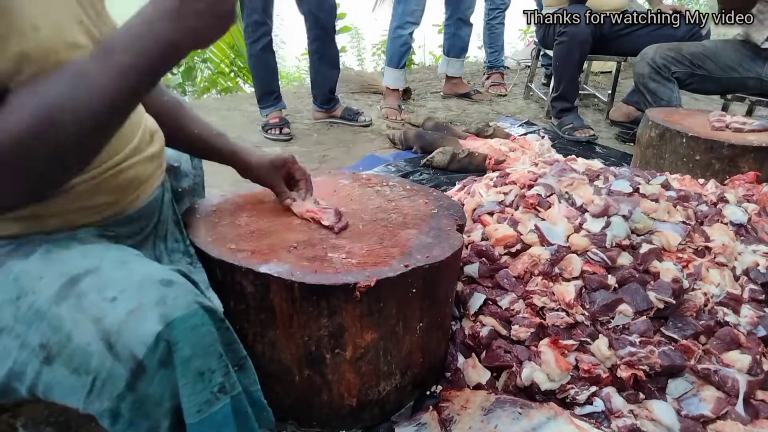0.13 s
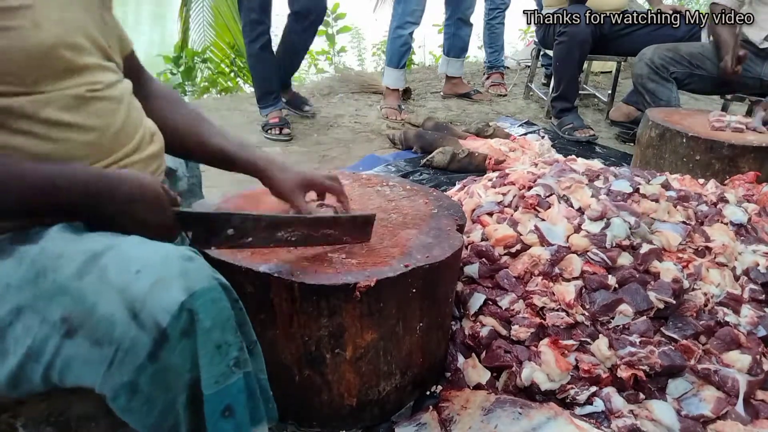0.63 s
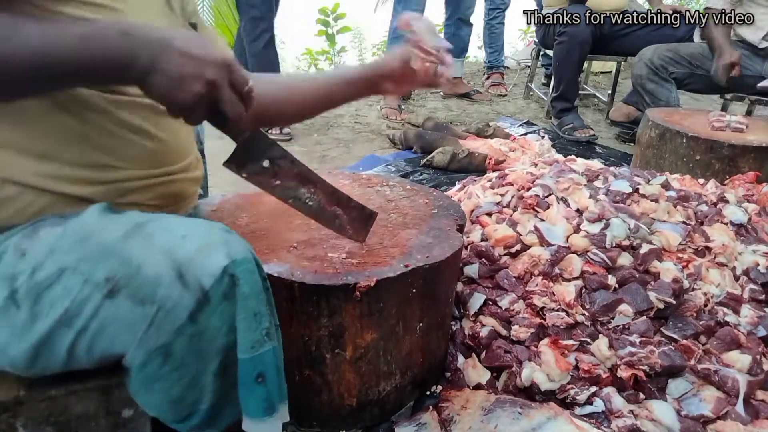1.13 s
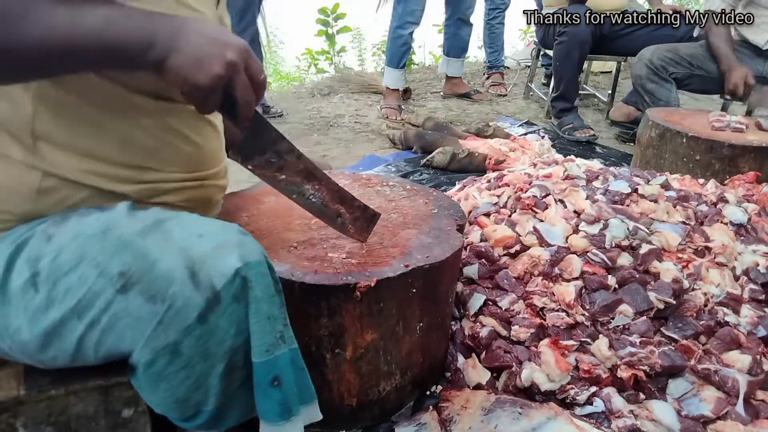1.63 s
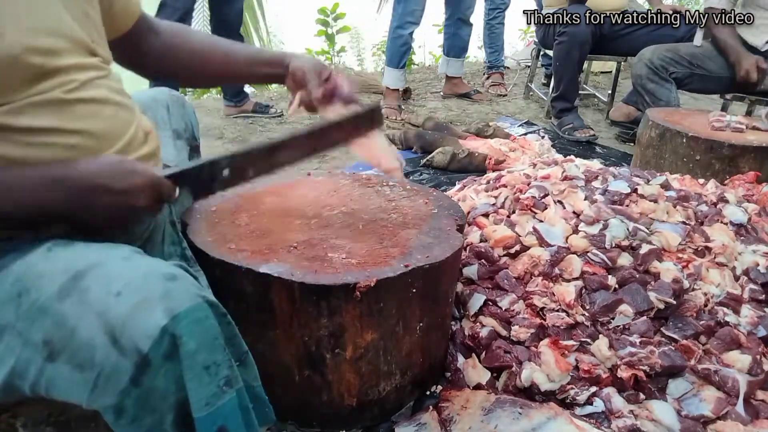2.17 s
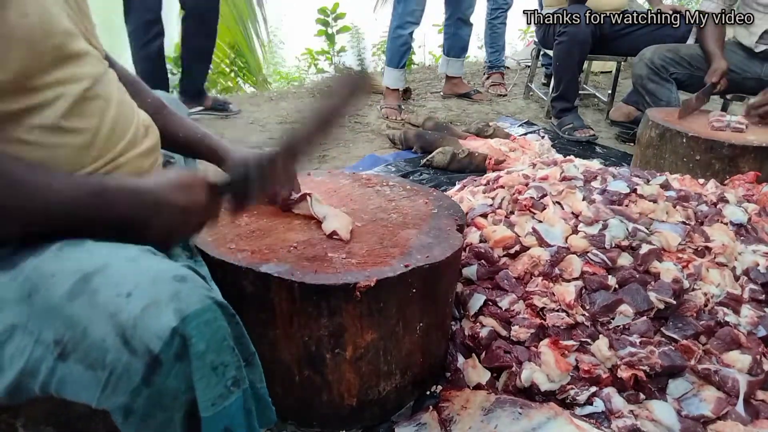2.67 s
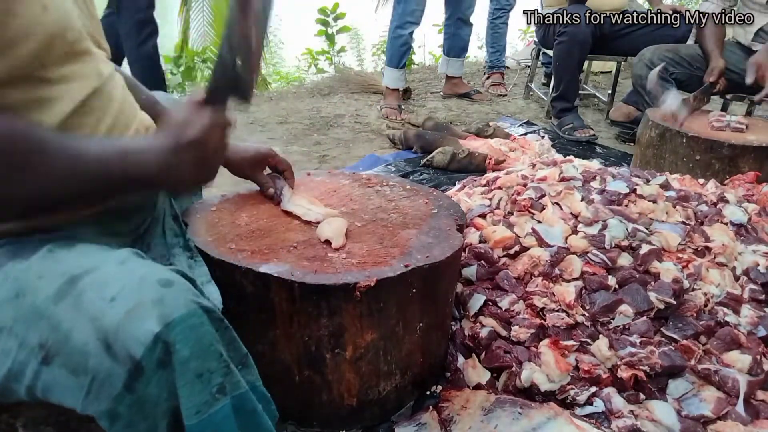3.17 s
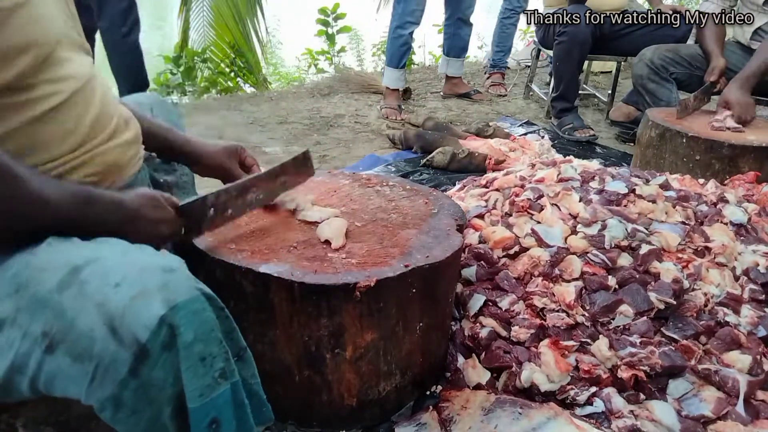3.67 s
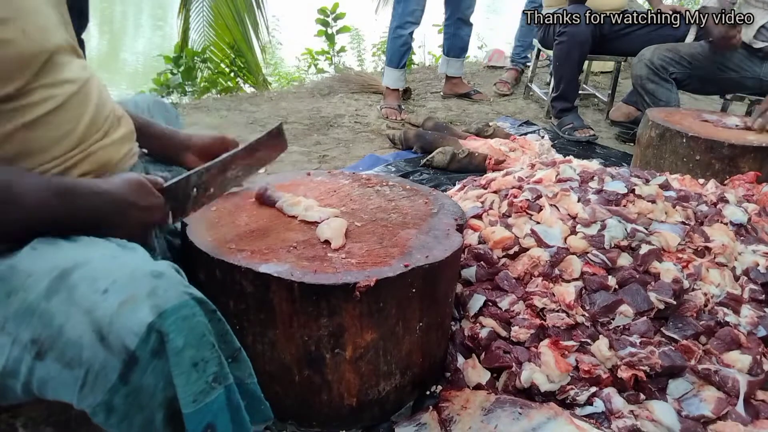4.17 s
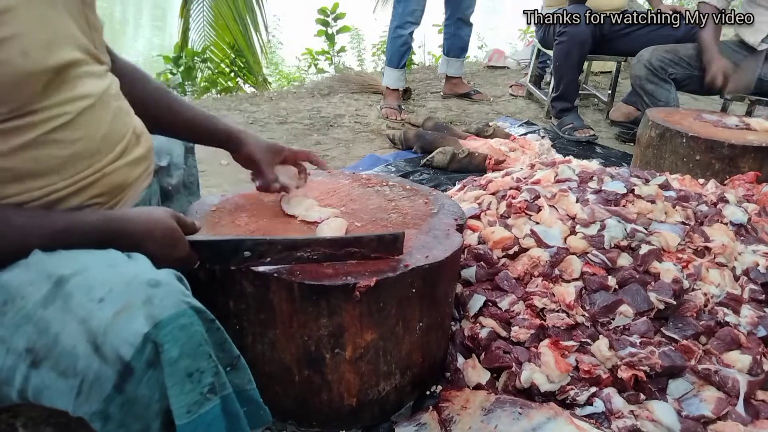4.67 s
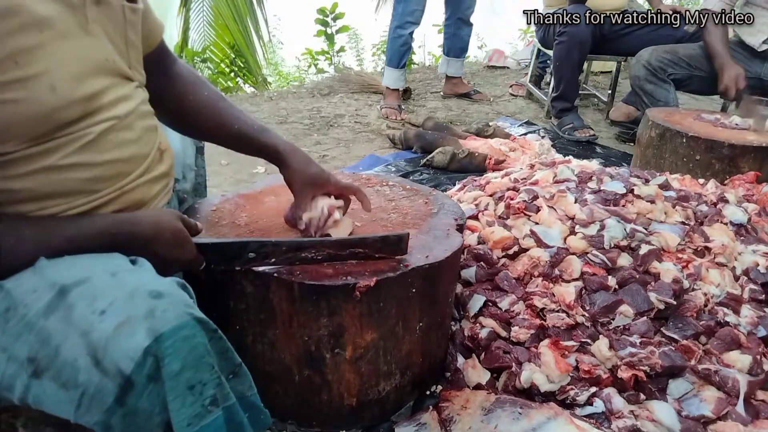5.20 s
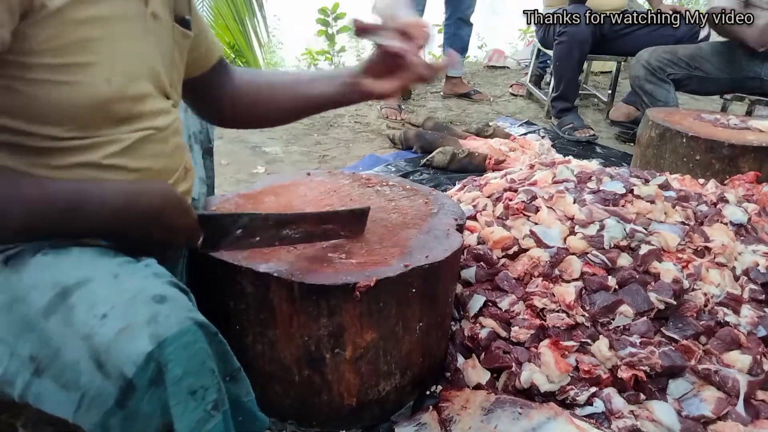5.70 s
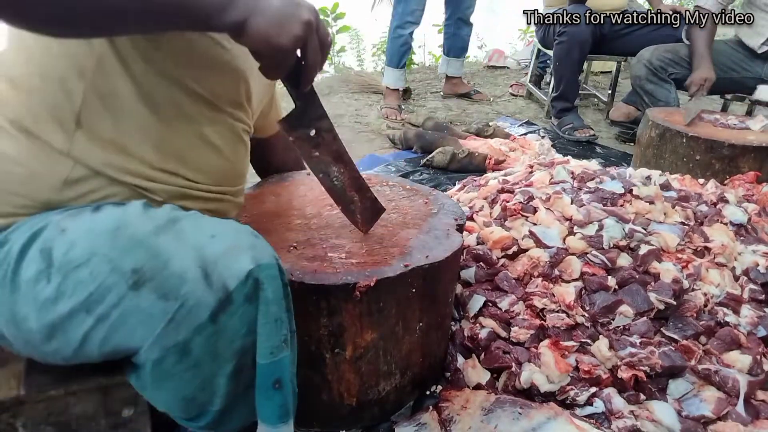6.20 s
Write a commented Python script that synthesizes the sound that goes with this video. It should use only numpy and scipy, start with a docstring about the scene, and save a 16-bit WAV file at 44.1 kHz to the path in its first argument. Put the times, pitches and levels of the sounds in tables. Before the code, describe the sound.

Heavy steel cleavers chop meat on wooden log blocks in an open yard, sharp woody cracks overlapping with brief blade rings and faint echoes.

```python
"""Three butchers chop meat with heavy steel cleavers on log blocks in an open yard, in overlapping rhythms.
Each blow is a crack of splitting wood (banded noise), a thump of the log and a short ring of the blade
(decaying modes); noise tails give the yard's reflections and the answers of two walls.
Softer touches, scraps of meat, hollow raps, faint squeaks (gliding sines), wind on the microphone
(lumpy noise and low pressure swings), a hum, a rustle and a sizzle (coloured noise) fill the gaps."""
import sys
import numpy as np
from scipy import signal
from scipy.fft import rfft, irfft
from scipy.io import wavfile
from scipy.ndimage import uniform_filter1d

SR = 44100
rng = np.random.default_rng(int(sys.argv[2]) if len(sys.argv) > 2 else 0)


def makeup_ratio(level_db):
    """Linear amplitude ratio for a level in decibels (20 dB per factor of ten)."""
    decades = np.asarray(level_db, float) / 20
    return 10 ** decades


def unload_audio(sound):
    """Save the sound as a 16-bit wav file, at the path given as the first command line argument."""
    columns = np.transpose(np.atleast_2d(sound))
    # keep every value between -1 and 1, then stretch to whole-number steps
    steps = np.round(np.clip(columns, -1, 1) * 32767)
    wavfile.write(sys.argv[1], SR, steps.astype(np.int16))


N = 279153

# Blows of the cleavers. Each row: time in seconds, which cleaver, peak of the knock (0.5-1.5 kHz) in dB,
# then in dB re knock the thump below, the crack (1.5-4.5 kHz) and the spit above,
# and the glance from 0, edge buried in the wood, to 1, springing off it.
BLOWS = [(.037, "third", -13.5, -8.5, 4, -12, 0.046), (.156, "first", -7, -2, -7, -22, 0.066),
         (.383, "second", -15, -6.5, -6, -21.5, 0.98), (.586, "first", -19.5, -2.1, -6.5, -27, 1),
         (1.006, "third", -19, -6.5, 0, -12, 0.48), (1.344, "first", -8, -5, -0.8, -16.5, 0.04),
         (1.825, "first", -8, -7, 3, -24, 0.054), (2.304, "first", -19.5, -4, -6.5, -27, 0.85),
         (2.459, "third", -11.5, -9.5, 3.5, -14.5, 0.54), (2.93, "second", -9, -4, -4.5, -8, 0.31),
         (3.392, "second", -8, -5.5, 1.5, -9, 0.043), (3.851, "second", -4, -9.5, -6, -21, 0.085),
         (4.432, "first", -5.5, -6, -6.5, -21, 0.13), (4.981, "first", -7.5, -3.5, -0.9, -16, .04),
         (5.411, "second", -44.5, 17, -1, -9, 0.85), (5.508, "first", -8, -1.5, -2.5, -18, .03),
         (5.949, "first", -28.5, -0.5, -11.5, -30, 0.4)]
# Bending modes of the three blades. Each row: frequency in Hz, relative level in dB when buried,
# the same when glancing, decay time T60 in seconds when buried.
FIRST_BLADE_MODES = [(830, -2, -12, .055), (1179, -5, -14, .07), (1530, -10, 1, .095),
                     (1780, -20, -12, .11), (2130, -13, -8, .06), (2575, -6, -9, .075),
                     (2795, -9, -10, .08), (3530, -10, -8, .09), (3680, -16, -18, .08),
                     (3855, -15, -5, .09), (5280, -12, -4, .08), (7340, -9, -6, .055),
                     (10150, -26, -24, .1)]
SECOND_BLADE_MODES = [(610, -14, -2, .07), (760, -1, 2, .045), (1250, 0, 0, .075), (1556, -9, -18, .1),
                      (1997, -26, -6, .14), (3007, -7, -25, .1), (3635, -12, -3, .07),
                      (4075, -10, -25, .05), (4130, -36, -16, .12), (5604, -30, -8, .08),
                      (7370, -28, -15, .07), (7650, -16, -20, .07)]
THIRD_BLADE_MODES = [(1084, 3.5, -13, 0.023), (1260, -5, -1.5, 0.025), (1530, -23, -29, 0.072),
                     (2082, 23, 10, 0.011), (3140, -8, -11.5, 0.024), (3630, -22.5, -11.5, 0.017),
                     (7340, 0, -10.5, 0.041), (10100, -5.5, -6, 0.029)]
# How sharply each cleaver's edge meets the wood. Each entry: snap before band shaping in dB.
EDGE_SNAP_DB = [18.5, 12, 24]
# How long each cleaver's contact lasts. Each entry: factor on the decay times.
CONTACT_STRETCH = [1.08, 0.84, 0.85]
# Ring of each blade. Each row: level in dB re blow when buried, the same when glancing.
RING_RE_BLOW_DB = [(-1.2, -4), (-3.5, -1.5), (-6, -9)]
# Borders of the knock, crack and spit bands. Each entry: frequency in Hz.
BAND_EDGES_HZ = [500, 1500, 4500, 17000]


def cleaver(name, modes, snap_db, stretch, ring_re_db):
    """Impact excitation of a plate: the edge slips through the meat, cracks on the log and sets the blade's
    modes ringing; returns (direct sound, what the surroundings scatter)."""
    near, far = np.zeros(N), np.zeros(N)
    hz, buried_db, glancing_db, t60 = np.transpose(modes)[:, :, None]
    band = np.searchsorted(BAND_EDGES_HZ, hz) - 1
    for s, who, knock_db, thump_db, crack_db, spit_db, glance in BLOWS:
        if who != name:
            continue
        glance = np.clip(glance, 0, 1)
        slip = contact(knock_db - 23, -21, crack_db, spit_db + 16.5, snap_db=-4, rise_s=0.0013, stretch=1)
        add(near, slip, s - .004)
        levels_db = (knock_db, thump_db, crack_db, spit_db)
        add(near, contact(*levels_db, snap_db=snap_db, rise_s=0.00017, stretch=stretch), s - .001)
        add(far, contact(*levels_db, snap_db=19.5, rise_s=0.0002, stretch=0.61), s)

        # bright blows stir the high modes
        ring_db = np.interp(glance, [0, 1], ring_re_db)
        scatter_db = rng.normal(0, 1.5, hz.shape)
        struck_db = knock_db + ring_db + np.array([0, crack_db, spit_db])[band] + scatter_db
        mode_db = buried_db + glance * (glancing_db - buried_db)
        longer = 1 + .3 * glance  # a blade that springs free rings longer
        blade = ring(hz, struck_db + mode_db, t60 * longer)
        add(near, blade, s - .0005)
        add(far, makeup_ratio(-7.5) * blade, s)
    return near, far


# Modes of the log block. Each row: mean frequency in Hz, relative level in dB, decay time T60 in seconds.
LOG_MODES = [(135, -23.5, 0.2), (213.2, -6, 0.057), (273.3, 6.5, 0.024), (401, -4, 0.046)]
# Spectrum of the splitting wood in knock and crack. Each row: frequency in Hz, relative level in dB per Hz.
WOOD_SPECTRUM = [(180, -39), (300, 9.5), (407, 7.5), (551, -8.5), (804, -1.5), (897, -4.5), (1570, -2.5),
                 (1860, -2.5), (2820, -1.5), (5500, -24.5), (7150, -50.5), (12100, -120)]
# Spectrum of the spit. Each row: frequency in Hz, relative level in dB per Hz.
SPIT_SPECTRUM = [(2350, -42), (4000, 1.5), (4640, -6), (5470, -15.5), (5870, -19.5), (6970, -26.5),
                 (7890, -12.5), (10800, -30.5), (15200, -29.5), (16000, -36), (16400, -48)]
# Decay of the first bite, knock to spit. Each entry: T60 in seconds at stretch 1.
BITE_T60_S = [0.02, 0.034, 0.0067]
# Decay of the splintering after it, knock to spit. Each entry: T60 in seconds at stretch 1.
SPLINTER_T60_S = [0.11, 0.062, 0.088]
# The snap is nearly even across the bands, slightly weaker in the top one. Each entry: gain in dB, knock to spit.
SNAP_SHARE_DB = [0, 0, -0.5]


def contact(knock_db, thump_db, crack_db, spit_db, snap_db, rise_s, stretch):
    """Fracture noise: a snap, then splitting fibres dying in each band at their own pace; the log answers
    with a modal thump."""
    splinter_db = -9.5  # re first bite
    t = np.arange(SR // 5) / SR
    bursts = makeup_ratio(4.9 * rng.standard_normal(len(t)))
    grit = rng.standard_normal(len(t)) * bursts * (1 - np.exp(-t / rise_s))
    snap = np.arange(len(t)) == 30  # one-sample impulse

    hz, mode_db, t60 = np.transpose(LOG_MODES)[:, :, None]
    pitch = rng.normal(1, 0.13, hz.shape)  # each spot of the block sounds a little different
    log_modes = makeup_ratio(mode_db - 60 * t / t60) * np.sin(2 * np.pi * hz * pitch * t)
    thump = log_modes.sum(axis=0) * (1 - np.exp(-t / 0.0032))

    parts = [thump]
    for band, spectrum in enumerate((WOOD_SPECTRUM, WOOD_SPECTRUM, SPIT_SPECTRUM)):
        bite = makeup_ratio(-60 * t / (stretch * BITE_T60_S[band]))
        splintering = makeup_ratio(splinter_db - 60 * t / (stretch * SPLINTER_T60_S[band]))
        force = makeup_ratio(snap_db + SNAP_SHARE_DB[band]) * snap + grit * (bite + splintering)
        sos = signal.butter(3, BAND_EDGES_HZ[band:band + 2], "band", fs=SR, output="sos")
        parts.append(signal.sosfilt(sos, colour(force, spectrum)))

    levels_db = knock_db + np.array([thump_db, 0, crack_db, spit_db])
    out = np.zeros(len(t))
    for part, level_db in zip(parts, levels_db):
        peak = np.sqrt(2 * uniform_filter1d(part ** 2, size=160).max())  # from the loudest 160 samples
        out += part * makeup_ratio(level_db) / peak
    return out


def ring(hz, level_db, t60):
    """Modal decay: damped sines of chance phase; the body takes a moment to bend."""
    t = np.arange(SR // 3) / SR
    phase = rng.uniform(0, 2 * np.pi, hz.shape)
    modes = makeup_ratio(level_db - 60 * t / t60) * np.sin(2 * np.pi * hz * t + phase)
    return modes.sum(axis=0) * (1 - np.exp(-t / 0.0012))


# The two walls. Each row: delay in seconds, nominal level in dB, spread in seconds.
WALL_ECHOES = [(0.052, -27, 0.018), (0.108, -30, 0.022)]
# Colour of all reflections. Each row: frequency in Hz, gain in dB.
REFLECTION_COLOUR = [(100, 5), (300, -2.5), (1000, -3.5), (3000, 2), (6000, 7.5), (12000, 4)]
# How much each source stirs the yard. Each entry: gain in dB for the three cleavers, then the touches.
YARD_SHARE_DB = [2, -5.5, -9, -7]
# What the near wall, then the far wall, return. Each row: gain in dB for the three cleavers, then the touches.
WALL_SHARE_DB = [
    [1.5, -1, -4.5, -6],
    [1.5, -3.5, 0.5, -6.5],
]


def yard(sources):
    """Diffuse reflection: convolution with scattered, dying noise and with the blurred answers of two walls."""
    level_db, t60_s, start_s = -18, 0.69, 0.0051
    t = np.arange(SR) / SR
    build_up = 1 - np.exp(-(t / start_s) ** 2)
    powers = [makeup_ratio(2 * level_db - 120 * t / t60_s) * build_up * 14 / t60_s]
    for delay, echo_db, spread in WALL_ECHOES:
        powers.append(makeup_ratio(2 * echo_db) * np.exp(-((t - delay) / spread) ** 2) / spread)
    out = np.zeros(N)
    for share_db, power in zip([YARD_SHARE_DB, *WALL_SHARE_DB], powers):
        response = colour(rng.standard_normal(SR) * np.sqrt(power / SR), REFLECTION_COLOUR)
        stirred = makeup_ratio(np.array(share_db)) @ sources
        out += signal.fftconvolve(stirred, response)[:N]
    return out


# Edge entering meat, scraps landing, bumps. Each row: time in seconds, knock peak in dB,
# then thump, crack and spit in dB re knock.
TOUCHES = [(0.139, -56, 7, -1, -25), (.152, -47, -20, -11, -1.5), (.410, -54, -8, 5, 7),
           (0.529, -62.5, 0, -3, 10), (0.947, -41.5, -18.5, -2, 1), (.993, -44, -14, 2, -3),
           (1.940, -41.5, -15.5, -8, -5.5), (2.914, -29.5, -9, -2, -13), (2.922, -23, -12, -5, -11),
           (3.318, -54.5, -7, 5.5, 2), (4.124, -50.5, 13.5, -16.5, -21), (4.287, -21, -2.5, -16.5, -29.5),
           (5.607, -47, -12, 11, 7), (5.618, -34.5, -8, 2, 0), (5.65, -49.5, -6, 8, -2)]
# Raps on something hollow. Each row: time in seconds, level in dB.
HOLLOW_RAPS = [(2.817, -44.5), (4.288, -11)]
# Modes of the hollow body. Each row: frequency in Hz, level in dB re rap, decay time T60 in seconds.
HOLLOW_MODES = [(422, -5, 0.057), (767, 6, 0.027), (848, -8, 0.027), (1020, -10, 0.084),
                (2020, -20.5, 0.026), (3100, -32, 0.012)]


def touches():
    """Soft impact: the same crack and thump with a weak snap and no steel; the hollow raps are modal decays."""
    out = np.zeros(N)
    for s, *levels_db in TOUCHES:
        add(out, contact(*levels_db, snap_db=1, rise_s=0.00013, stretch=1.3), s - .001)
    hz, mode_db, t60 = np.transpose(HOLLOW_MODES)[:, :, None]
    for s, rap_db in HOLLOW_RAPS:
        add(out, ring(hz, rap_db + mode_db, t60), s - .001)
    return out


# Faint squeaks. Each row: start in seconds, end in seconds, first frequency in Hz, last in Hz, nominal level in dB.
SQUEAKS = [(.96, 1.31, 7620, 7420, -68), (1.675, 1.81, 605, 570, -59), (1.68, 1.81, 7900, 7650, -70),
           (1.69, 1.82, 8850, 8800, -69), (1.69, 1.81, 10020, 9980, -73), (2.0, 2.28, 730, 690, -64),
           (2.3, 2.445, 660, 690, -57), (3.577, 3.726, 764, 700, -56), (6.2, 6.34, 1560, 1524, -66),
           (6.27, 6.331, 480, 520, -57)]


def squeaks():
    """Narrow-band modulation: a gliding sine under a random waver as fast as the tone is broad."""
    width = .015  # breadth as a share of the pitch
    out = np.zeros(N)
    for start, end, first_hz, last_hz, level_db in SQUEAKS:
        count = max(round((end - start) * SR), 2)
        r = np.exp(-2 * np.pi * width * first_hz / SR)
        waver = signal.lfilter([np.sqrt(1 - r * r)], [1, -r], rng.standard_normal(SR))[SR // 2:]  # run in
        waver = signal.lfilter([1 - r], [1, -r], waver)[-count:]
        phase = 2 * np.pi * np.cumsum(np.linspace(first_hz, last_hz, count)) / SR
        tone = np.sin(phase) * np.sqrt(np.hanning(count) * 2)
        add(out, tone * (.5 + waver) * makeup_ratio(level_db), start)
    return out


# Wind and hum over time. Each row: time in seconds, wind rumble in dB, yard hum in dB.
AIR = [(0.0, -68, -54), (0.26, -58, -53.5), (0.81, -65.5, -61.5), (1.9, -60.5, -56.5), (2.33, -65, -57.5),
       (2.47, -69, -56.5), (2.64, -62.5, -57), (3.31, -63, -59.5), (3.47, -57, -58.5), (4.51, -62, -54.5),
       (4.69, -60, -60.5), (4.93, -64.5, -56), (5.08, -55.5, -59.5), (5.52, -54.5, -53), (5.9, -56, -57),
       (6.33, -54.5, -54.5)]
# Strong gust buffets on the microphone port. Each row: time in seconds, nominal level in dB, frequency in Hz.
BUFFETS = [(2.749, -47, 104), (3.508, -42.5, 91), (4.116, -31.5, 135), (4.919, -43.5, 151),
           (5.08, -42, 161), (5.154, -41, 125), (5.349, -38.5, 94), (5.401, -43, 270), (5.72, -42, 166),
           (5.825, -40, 144)]


def buffets():
    """Turbulent pressure pulses: each is a few cycles of low swing; the lesser, random ones grow with the wind."""
    over_wind_db, middle_hz = 8.5, 119  # least lesser buffet; pitches lie half an octave either side
    out = np.zeros(N)
    when, size, pitch = rng.random((14, 3)).T
    when = when * N / SR
    wind_db = np.interp(when, *np.transpose(AIR)[:2])
    lesser = zip(when, wind_db + over_wind_db + 5 * size, middle_hz * 2 ** (pitch - .5))
    for s, level_db, hz in [*BUFFETS, *lesser]:
        turns = np.arange(SR // 10) / SR * hz
        swell = turns / 0.45 * np.exp(1 - turns / 0.57)
        add(out, makeup_ratio(level_db) * swell * np.sin(2 * np.pi * turns), s + 0.0038)
    return out


# Spectra of wind, hum, rustle and sizzle. Each row: frequency in Hz, relative level in dB per Hz.
RUMBLE_SPECTRUM = [(15, -50), (25, -5), (32, -39.5), (67, -1), (92, 9.5), (400, -18.5), (520, -28),
                   (880, -120)]
HUM_SPECTRUM = [(120, -35), (200, -1.5), (363, -7.5), (515, -5.5), (1070, -11), (1470, -11), (2490, -13),
                (3140, -9), (6500, -31), (8450, -55.5), (14300, -120)]
RUSTLE_SPECTRUM = [(2940, -16), (5000, -8.5), (6680, -19), (8080, -5), (8470, -2.5), (9420, -11.5),
                   (12000, -21), (15600, -57), (22000, -120)]
SIZZLE_SPECTRUM = [(6470, -26), (11000, -6.5), (13000, -5), (15100, 9), (15700, 2.5), (16100, -12.5),
                   (16300, -15.5)]
# Swishes of cloth and scraping. Each row: start in seconds, length in seconds, nominal rustle level in dB,
# then hum and sizzle in dB re rustle.
SWISHES = [(.42, 0.084, -80, 3, 2.5), (1.001, 0.08, -59, 11.5, -8), (2.54, 0.11, -66, 13.5, -9),
           (3.578, 0.15, -54.5, 1.5, -10), (3.987, 0.21, -65.5, 8, -7), (4.17, 0.21, -67, 6, 5),
           (5.604, 0.097, -59.5, 6, -2), (5.98, 0.078, -65, 13.5, 3), (6.097, 0.13, -62.5, 0, 3.5),
           (6.293, 0.055, -63.5, 13, -7)]


def background():
    """Filtered noise: lumpy wind on the microphone, a broad hum of the yard, a rustle and its sizzle;
    swishes raise the last three."""
    rustle_mean_db, sizzle_mean_db, hum_mean_db = -70.5, -79, -58
    rustle_follows = 0.44  # share of the hum's swing in the rustle
    edge_s = 0.033  # softness of a swish's start and end
    t = np.arange(N) / SR
    s, wind_db, hum_db = np.transpose(AIR)
    wind_db, hum_db = np.interp(t, s, wind_db), np.interp(t, s, hum_db)
    steady_rustle_db = rustle_mean_db + rustle_follows * (hum_db - hum_mean_db)
    gains = [makeup_ratio(wind_db), makeup_ratio(hum_db), makeup_ratio(steady_rustle_db), makeup_ratio(sizzle_mean_db)]
    for start, length, rustle_db, low_db, top_db in SWISHES:
        shape = (np.tanh((t - start) / edge_s) - np.tanh((t - start - length) / edge_s)) / 2
        for layer, level_db in enumerate((rustle_db + low_db, rustle_db, rustle_db + top_db), start=1):
            gains[layer] = np.hypot(gains[layer], makeup_ratio(level_db) * shape)

    spectra = (RUMBLE_SPECTRUM, HUM_SPECTRUM, RUSTLE_SPECTRUM, SIZZLE_SPECTRUM)
    flickers = [(3.0, 25), (1.2, 15), (1.2, 21), (1.5, 18)]  # (depth in dB, turns per second)
    out = np.zeros(N)
    for gain, spectrum, (depth_db, rate) in zip(gains, spectra, flickers):
        noise = colour(rng.standard_normal(N), spectrum)
        out += gain * rms_one(noise * makeup_ratio(depth_db * drift(rate)))
    return out


def rms_one(x):
    """Power normalisation: scale to unit rms."""
    return x / np.sqrt(np.mean(x ** 2) + 1e-20)


def colour(x, points):
    """Minimum-phase filtering: a causal response through (Hz, dB) points, by folding the cepstrum."""
    hz, level_db = np.transpose(points)
    grid = np.maximum(np.arange(2049) * SR / 4096, 1)
    cepstrum = irfft(np.interp(np.log(grid), np.log(hz), level_db) * np.log(10) / 20)
    cepstrum[1:2048] *= 2
    cepstrum[2049:] = 0
    return signal.fftconvolve(x, irfft(np.exp(rfft(cepstrum))))[:len(x)]


def drift(rate):
    """Random modulation: a wander through knots of spread 1, about rate turns a second."""
    knots = rng.standard_normal(int(N / SR * 40) + 50)
    return np.interp(np.arange(N) / SR * np.clip(rate, .1, 39), np.arange(len(knots)), knots)


def add(out, sound, s):
    """Superposition: mix a sound in at s seconds."""
    at = max(round(s * SR), 0)
    out[at:at + len(sound)] += sound[:N - at]


def scene():
    """Superposition of the blows, their reflections and the quiet of the yard."""
    names = ("first", "second", "third")
    blades = (FIRST_BLADE_MODES, SECOND_BLADE_MODES, THIRD_BLADE_MODES)
    cleavers = zip(names, blades, EDGE_SNAP_DB, CONTACT_STRETCH, RING_RE_BLOW_DB)
    soft = touches()
    sources = [cleaver(*each) for each in cleavers] + [(soft, soft)]
    near, far = np.transpose(sources, (1, 0, 2))
    blows = near.sum(axis=0) + yard(far)
    # the microphone passes little deep bass from the blows
    blows = signal.sosfilt(signal.butter(3, 83, "high", fs=SR, output="sos"), blows)
    return (blows + background() + buffets() + squeaks())[None]


def roll_off(x):
    """The treble ends steeply here."""
    return signal.sosfilt(signal.butter(12, 16800, fs=SR, output="sos"), x)


def record(dry):
    """Band limiting and soft saturation: the top is cut, then the loudest peaks are rounded off."""
    cut = signal.sosfilt(signal.cheby2(10, 60, 16500, fs=SR, output="sos"), dry)
    mix = 1.181 * np.tanh(cut / 1.304)
    return roll_off(mix)


dry = scene()
out = record(dry)
unload_audio(out)
```